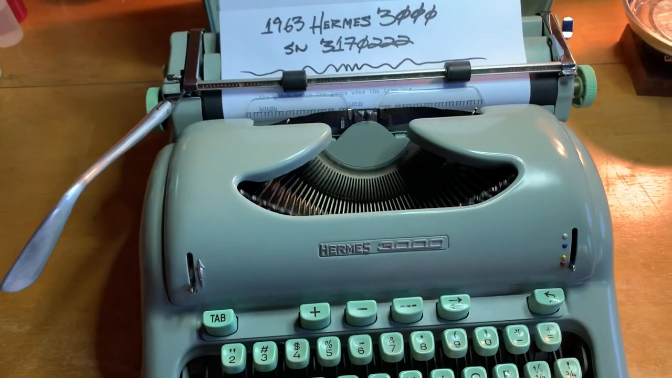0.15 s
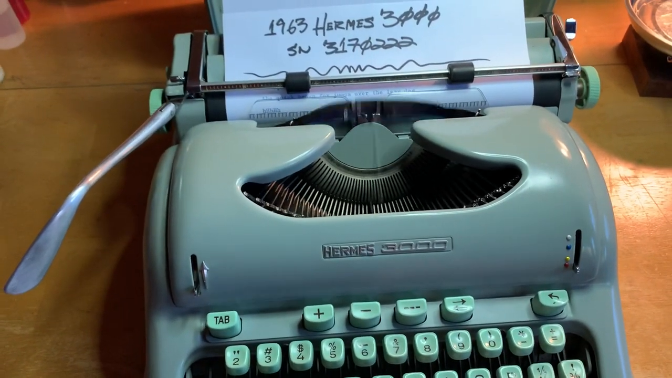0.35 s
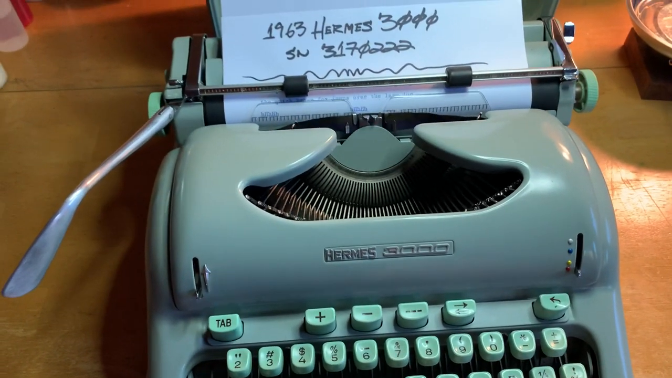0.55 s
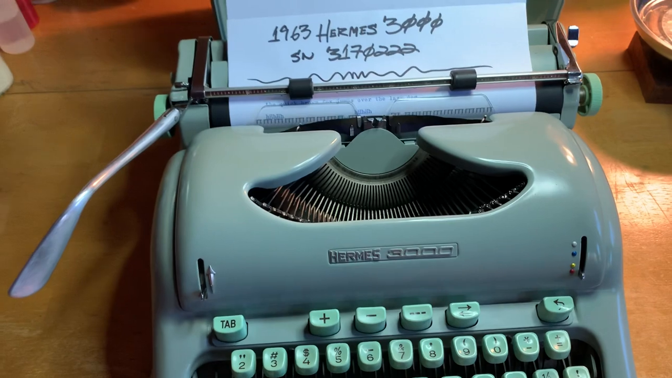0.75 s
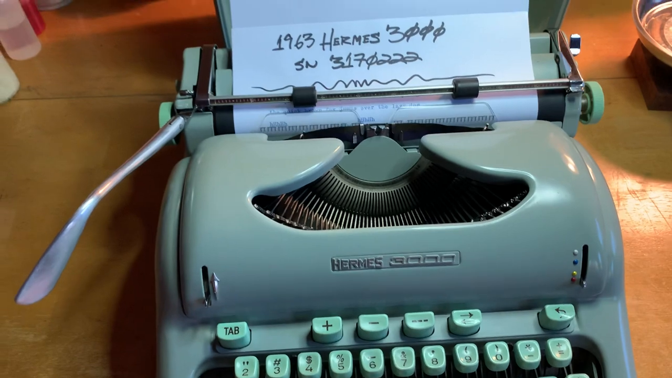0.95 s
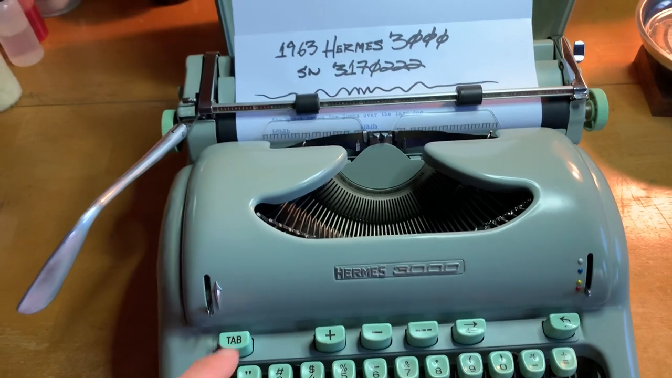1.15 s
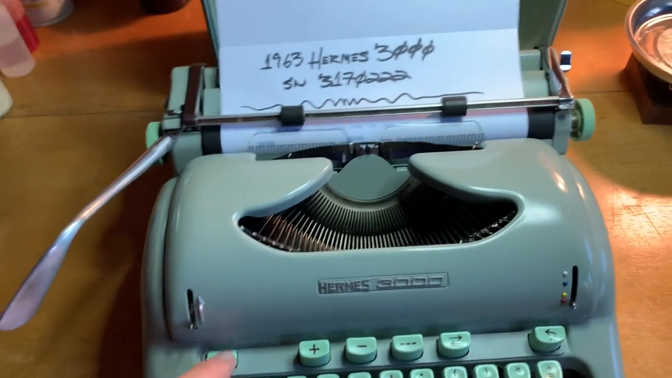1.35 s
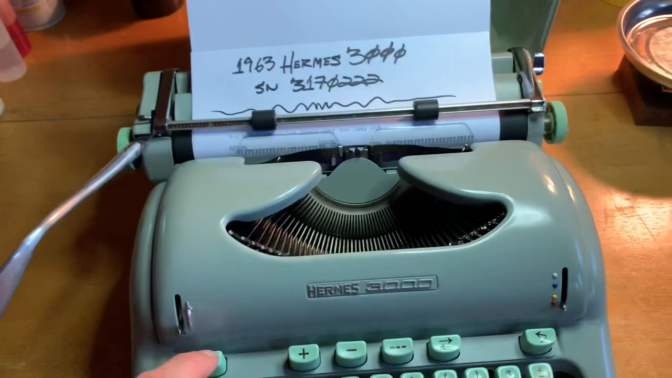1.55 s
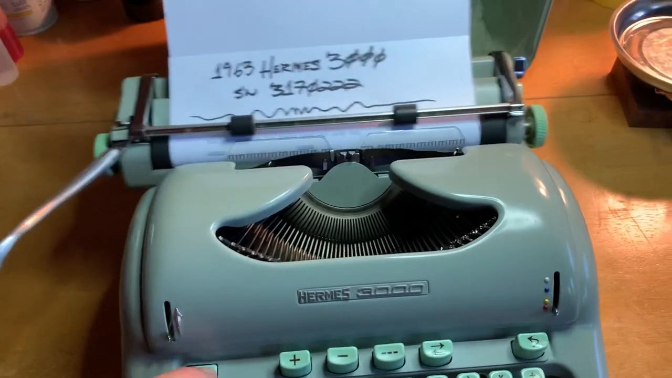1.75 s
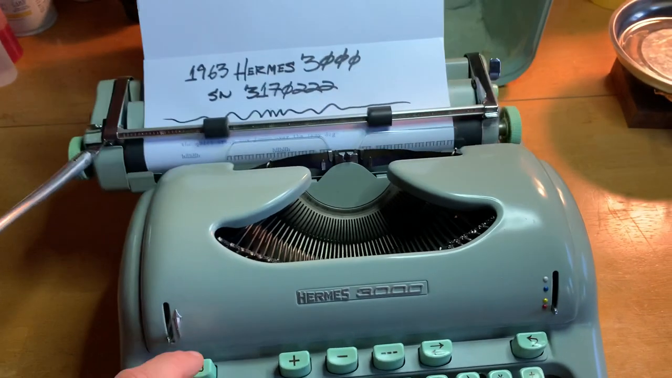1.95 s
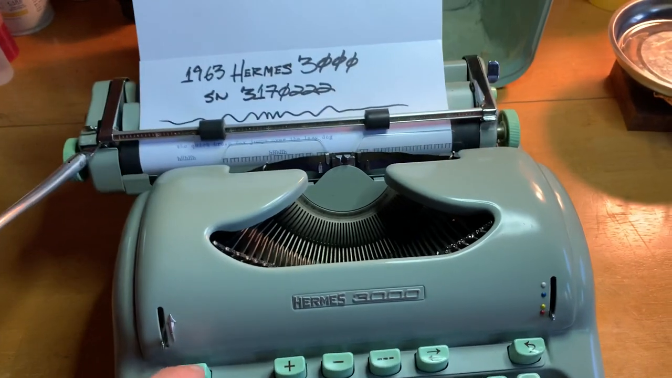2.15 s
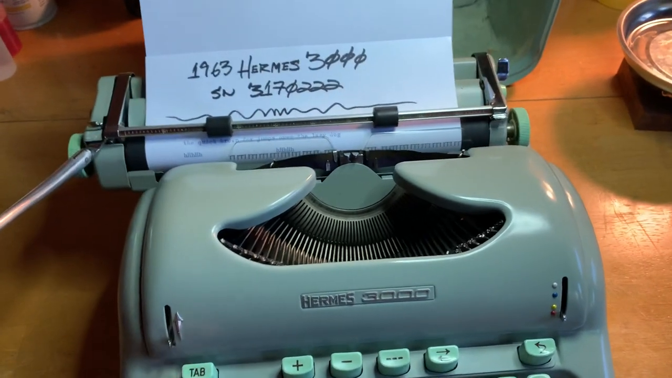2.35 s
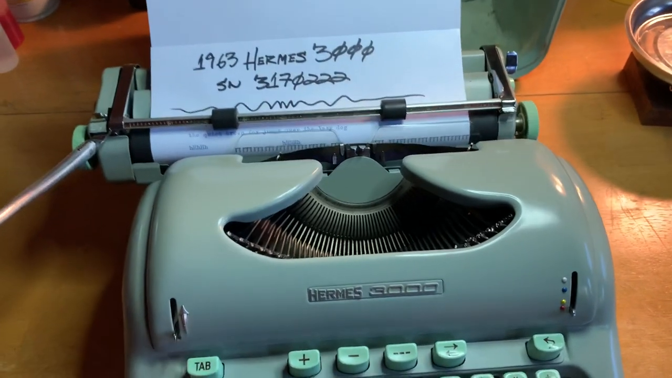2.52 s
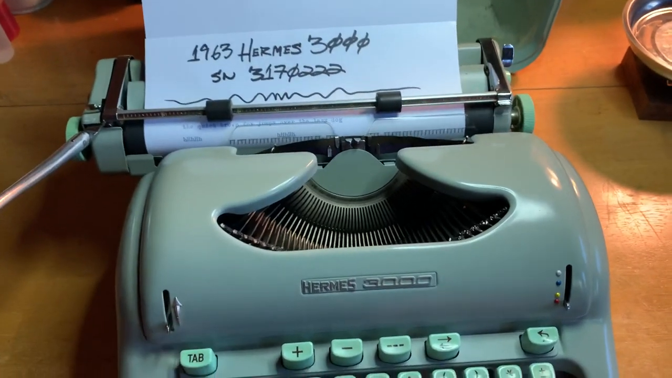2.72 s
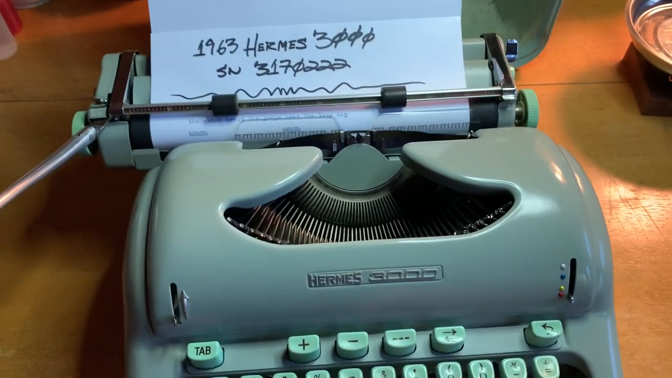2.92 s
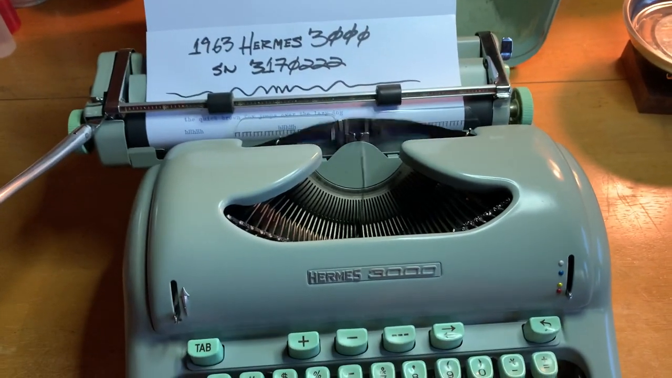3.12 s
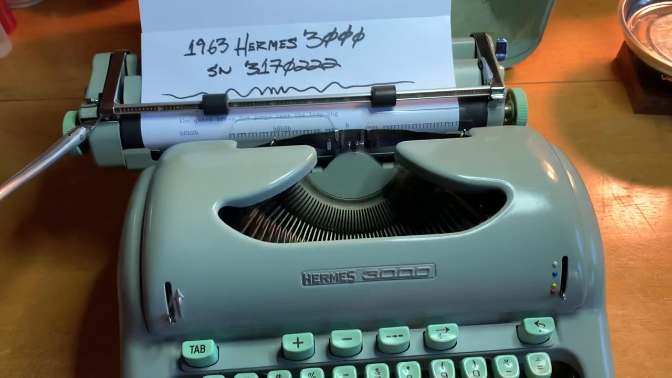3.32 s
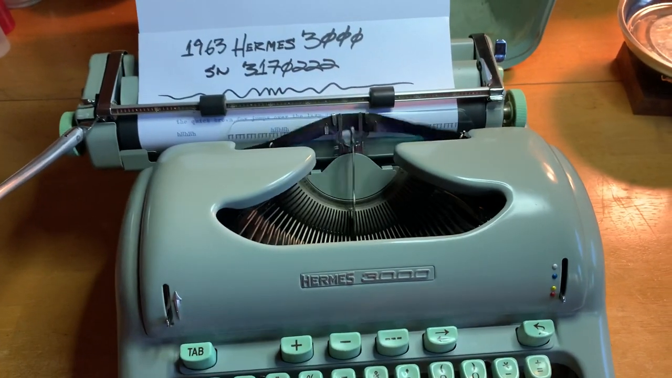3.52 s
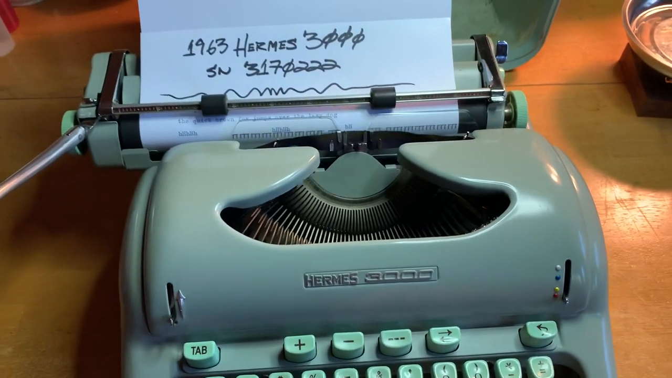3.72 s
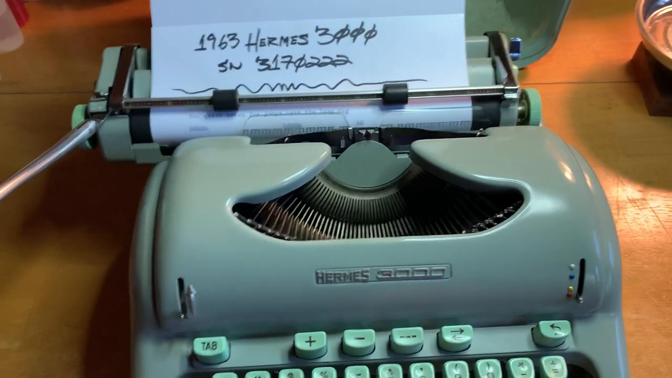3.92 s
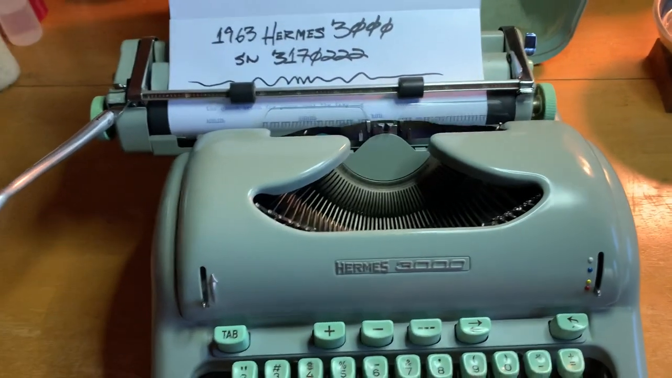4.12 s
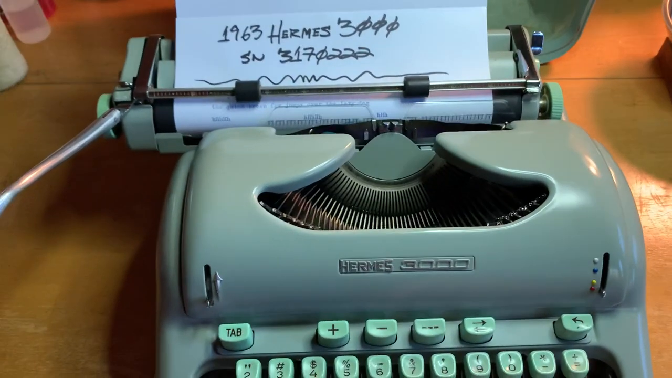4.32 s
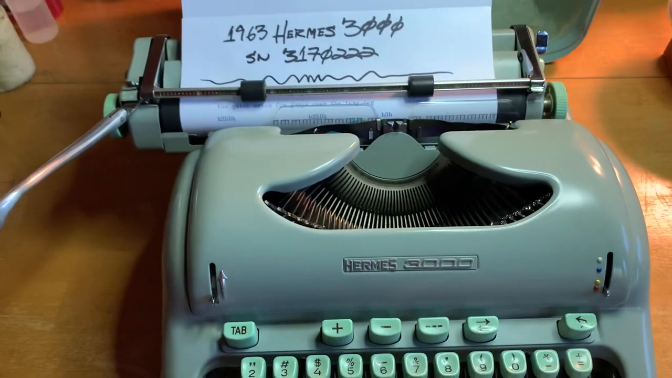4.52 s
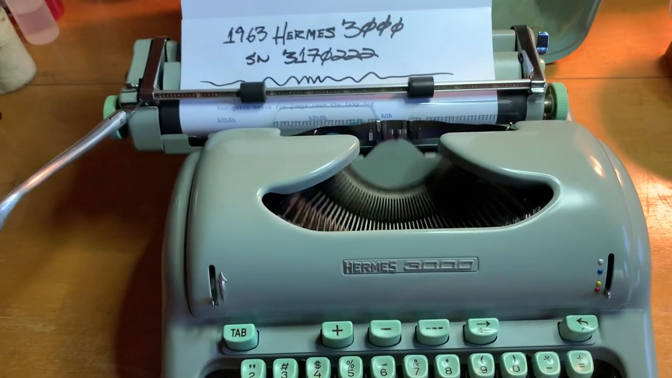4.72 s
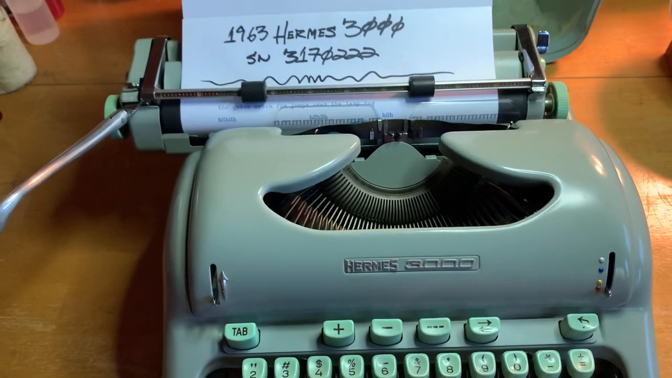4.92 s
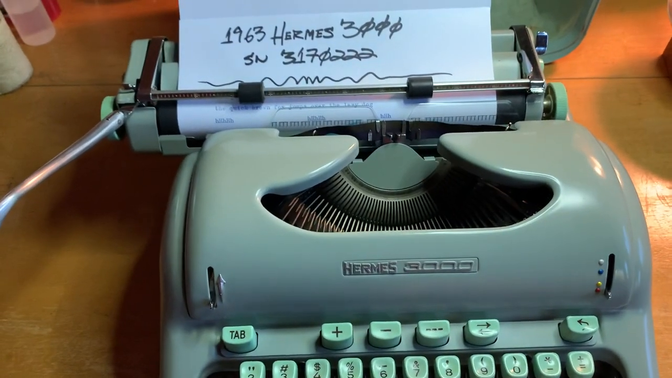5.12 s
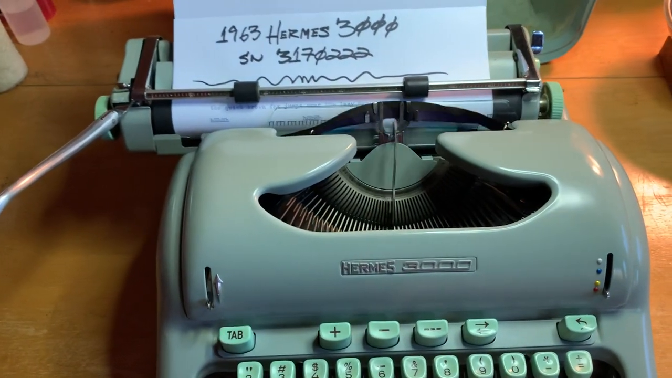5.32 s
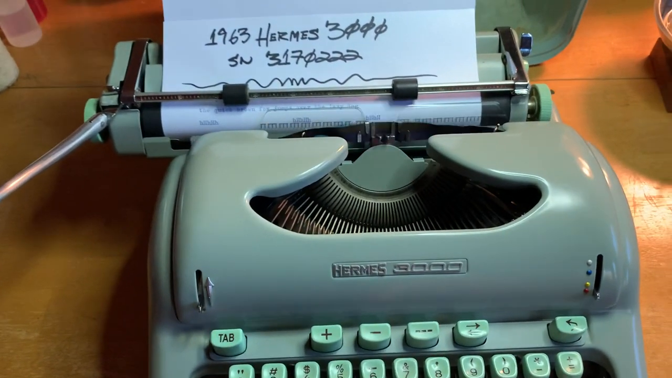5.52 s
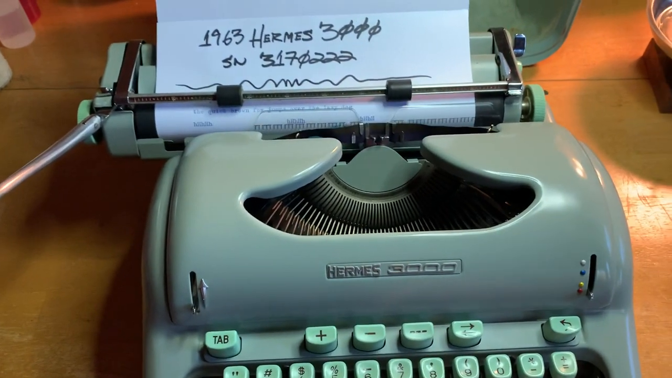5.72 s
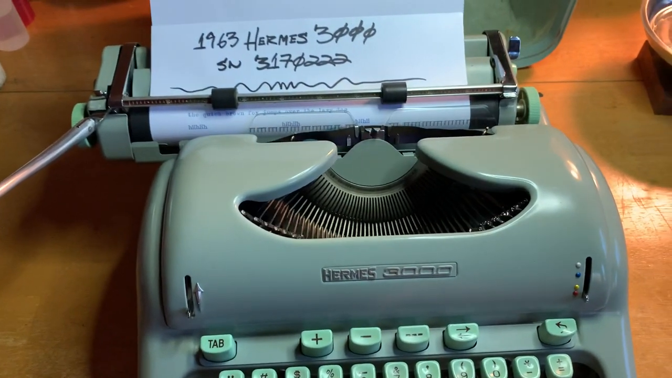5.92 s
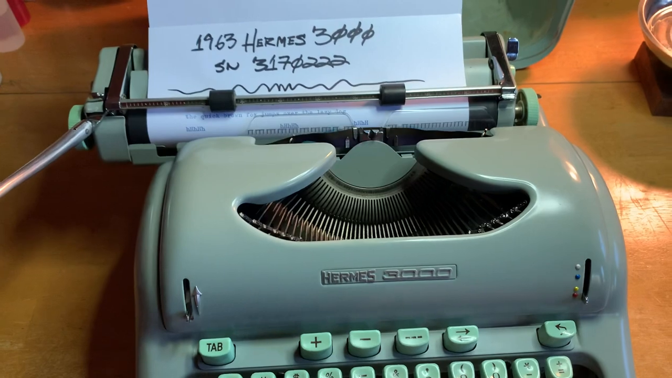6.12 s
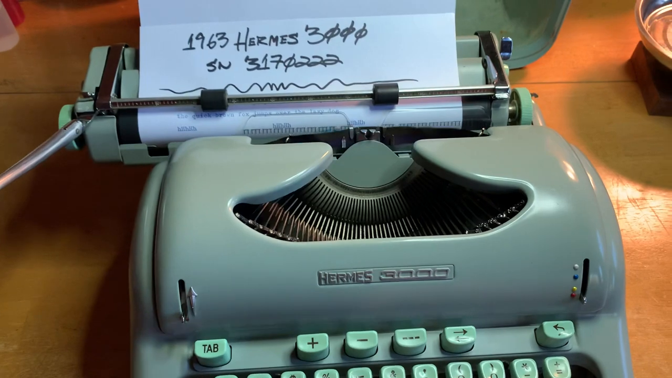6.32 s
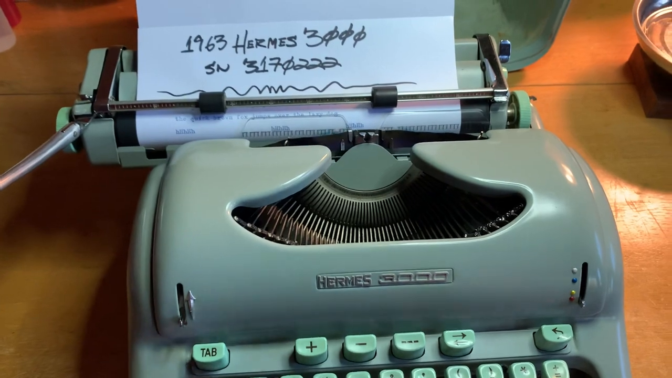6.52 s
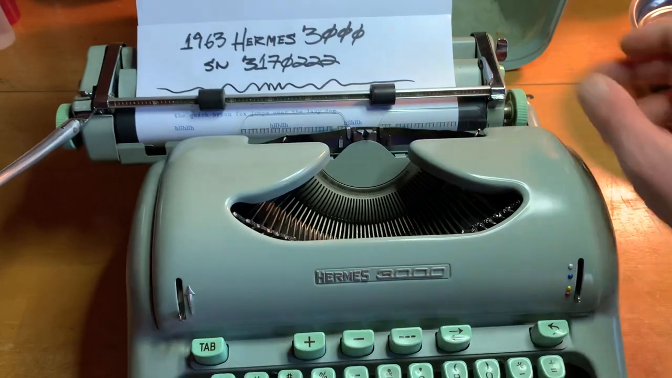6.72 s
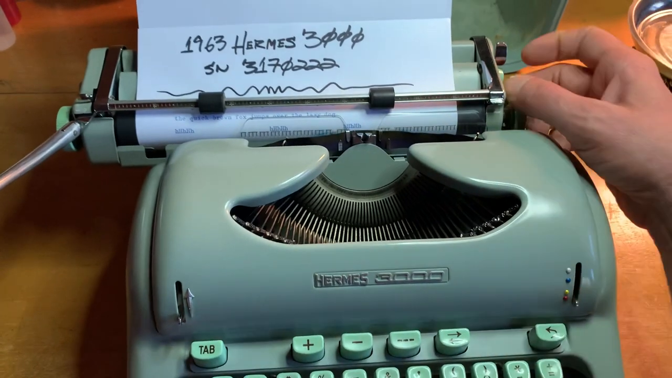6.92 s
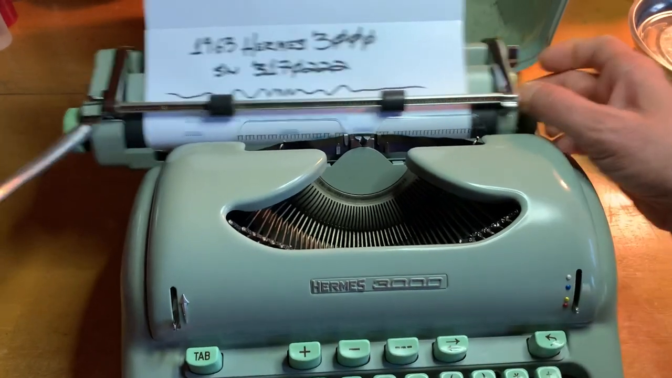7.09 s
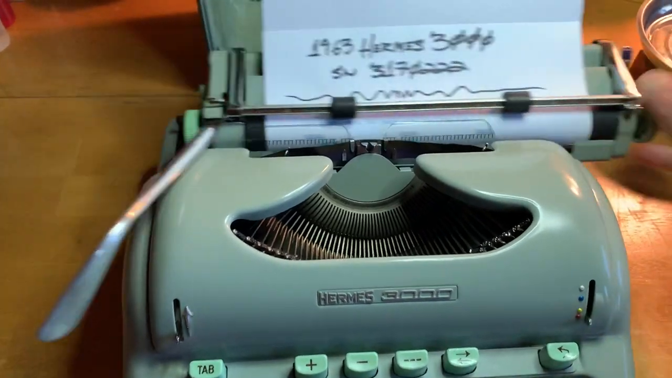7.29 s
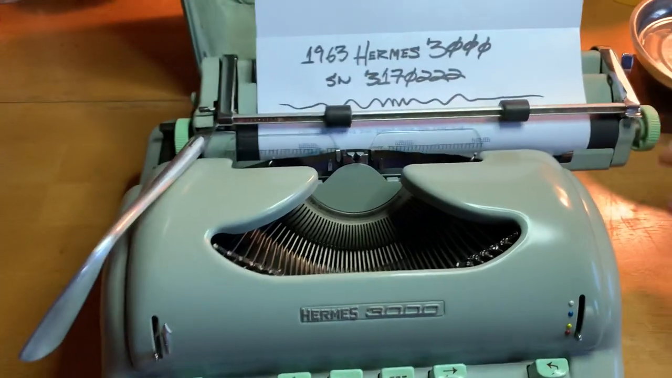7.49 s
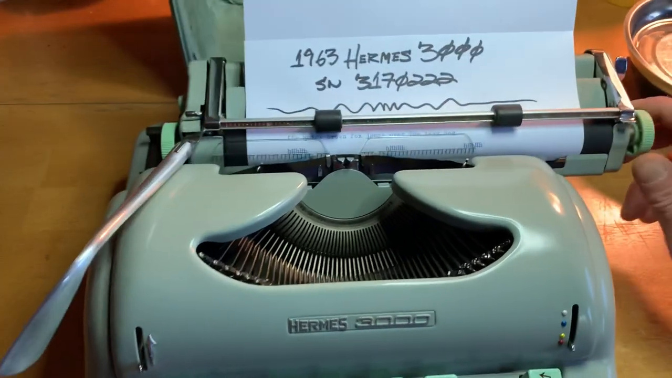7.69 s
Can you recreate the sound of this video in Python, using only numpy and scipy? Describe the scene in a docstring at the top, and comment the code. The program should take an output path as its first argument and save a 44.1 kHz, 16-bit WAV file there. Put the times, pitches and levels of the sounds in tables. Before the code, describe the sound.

Close, wide stereo sound of a manual typewriter on a wooden desk in a small, faintly rumbling room. A lever thump and one crisp letter strike come first, then the carriage lurches and rattles along. After a quiet pause, more single letters alternate with heavy shift and space thumps. A hand grips the knob and slides the carriage over its buzzing ratchet to a soft stop.

```python
"""Manual typewriter on a wooden desk, close by

Heard close to the machine, with a processed stereo spread, in a small, faintly rumbling room. Six letters
are struck one at a time: key linkage, escapement, type slug on the platen, type bar falling back. Shift and
space thump the desk, the carriage runs along on the tab key, and at the end a hand slides it back over its
ratchet. Contacts are bursts of coloured noise, ringing metal and desk are dying sines, and rolling is noise
pulsed by rack teeth."""
import sys
import numpy as np
from scipy import signal
from scipy.fft import rfft, irfft, next_fast_len
from scipy.io import wavfile
from scipy.ndimage import uniform_filter1d

SR = 44100
rng = np.random.default_rng(int(sys.argv[2]) if len(sys.argv) > 2 else 0)


def store_pcm(level_fs):
    """Save levels as 16-bit WAV."""
    pcm = np.round(np.clip(level_fs, -1, 1) * 32767).astype(np.int16)
    wavfile.write(sys.argv[1], SR, np.atleast_2d(pcm).T)


N = 341775
TIME = np.arange(N) / SR
# spectra are padded by a second for the tails
SIZE = next_fast_len(N + SR, True)
HZ = np.fft.rfftfreq(SIZE, 1 / SR)

# Levels below are relative: each layer adds its own offset.
# The typed letters. Each row: slug on the platen in seconds, slug level in dB, key down this many seconds
# earlier, key level in dB, type bar home this many seconds later, landing level in dB.
LETTERS = [(0.3722, -13, 0.037, -30, 0.12, -30.5), (3.043, -12, 0.036, -27.5, .1253, -31),
           (3.5093, -14, 0.041, -28.5, .1341, -28.5), (3.970, -11.5, 0.034, -23.5, 0.14, -32),
           (5.2847, -13.5, .0351, -27.5, .1363, -29.5), (6.1928, -13, 0.038, -26.5, 0.13, -31)]
# Shift, space bar and the carriage's end stop. Each row: start in seconds, level in dB, dull knock in dB,
# fade in seconds, push on the desk in dB.
THUMPS = [(0.159, -22.5, -26, 0.0038, -30.5), (3.326, -27.5, -20.5, 0.0063, -26),
          (3.787, -30.5, -29.5, .0075, -36), (4.7433, -17.5, -26, 0.0026, -27),
          (5.8455, -24, -26, 0.0072, -29), (7.379, -33, -35.5, 0.0092, -39)]
# The carriage catching as it lurches along on the tab key. Each row: start in seconds, level in dB,
# dull knock in dB, fade in seconds, push on the desk in dB.
LURCHES = [(1.344, -32.5, -35, 0.0041, -45), (1.4546, -36, -32, 0.014, -46.5),
           (1.5217, -28.5, -33, 0.0034, -45), (1.555, -36.5, -33, 0.006, -40.5),
           (1.68, -27.5, -31, 0.0052, -39), (1.834, -26, -28, 0.0049, -54),
           (1.864, -35, -35.5, 0.0093, -47), (1.902, -34, -28, 0.0056, -38)]
# Latches snapping. Each row: start in seconds, level in dB, fade in seconds.
CLICKS = [(0.0562, -51, 0.0036), (1.2922, -44, .0016), (1.329, -47, .0025), (1.494, -33.5, 0.0018),
          (1.654, -38.5, 0.0053), (2.6824, -54, 0.0068), (2.879, -57.5, 0.0057), (4.651, -51, 0.006),
          (4.6589, -35.5, 0.0015), (5.5549, -31, 0.0032), (5.752, -46.5, 0.007), (7.03, -46.5, 0.0022),
          (7.04, -40, 0.0023), (7.315, -48, 0.0024)]
# A hand taking hold of the platen knob. The one row: start in seconds, level in dB.
GRIP = (6.818, -45.5)
# Colour of steel on steel. Each row: frequency in Hz, gain in dB.
STEEL = [(60, -19.5), (300, -7.5), (900, -2.5), (1700, -5.5), (3200, 0.5), (5000, -2.5), (8000, -1.5),
         (10000, -1.5), (13000, -5.5), (15400, -9), (16200, -30.5)]

# a falling type bar rattles part of the way home: share of its fall, level in dB
RATTLE_SHARE, RATTLE_DB = .49, -36
TAB_START_S, TAB_END_S = 1.327, 1.925


def amp(db):
    """Amplitude ratio of a level in dB."""
    return 10 ** (np.asarray(db) / 20)


def read(points, hz):
    """A table's value on a log-frequency axis."""
    f, value = np.transpose(points)
    return np.interp(np.log(hz + 1), np.log(f + 1), value)


def add(mix, s, sound):
    """Lays a sound into the mix at time s."""
    part = mix[:, round(s * SR):][:, :sound.shape[-1]]
    part += sound[..., :part.shape[1]]


def grit(size, clump_db):
    """Noise of about unit power, bunched into tiny metal contacts of 32 samples each."""
    clumps = amp(clump_db * np.clip(rng.standard_normal(size // 32 + 1), -2, 2))
    clumps /= np.sqrt(np.mean(clumps ** 2))
    return rng.standard_normal((2, size)) * np.repeat(clumps, 32)[:size]


def contact(db, fade, rise=.0002, clump_db=2.0):
    """A burst of chatter between two parts; the point of contact gives each its own uneven colour."""
    t = TIME[:8192]
    hz = np.fft.rfftfreq(len(t), 1 / SR)
    knots = np.geomspace(600, 16000, 50)
    colour = amp(2.6 * np.interp(hz, knots, rng.standard_normal(len(knots)), left=0))
    colour /= np.sqrt(np.mean(colour ** 2))
    chatter = irfft(rfft(grit(len(t), clump_db)) * colour)
    return amp(db) * (1 - np.exp(-t / rise)) * np.exp(-t / fade) * chatter


def travel(mix, s, db, swell):
    """A lever rubs along its guide, ever louder, just before it lands at time s."""
    rub = contact(db, swell)[:, :round(.04 * SR)]
    add(mix, s - .04, rub[:, ::-1])  # a fade played backwards swells


def through_case(x, colour):
    """Causal filter of unit power: a broad colour with the resonances of the case and frame on top."""
    # Each row: resonance in Hz, width in Hz, boost in dB.
    case = [(353.4, 14, 4.5), (440, 170, 6), (574.8, 12, 8.5), (829, 53, 8), (990, 90, 6), (1282, 120, 4.5),
            (2360, 99, -2.5), (2399, 44, 6), (2723, 31, -7.5), (2993, 28, -2), (3500, 68, -4),
            (4030, 130, 3), (5530, 100, -3.5), (7833, 150, 4)]
    hz = np.fft.rfftfreq(8192, 1 / SR)
    peaks_db = sum(db / (1 + (2 * (hz - f) / width) ** 2) for f, width, db in case)
    gain = amp(read(colour, hz) + peaks_db)
    # folding the cepstrum forward gives minimum phase
    cepstrum = irfft(np.log(gain / np.sqrt(np.mean(gain ** 2))))
    cepstrum[1:len(hz) - 1] *= 2
    cepstrum[len(hz):] = 0
    taps = irfft(np.exp(rfft(cepstrum)))
    return signal.oaconvolve(x, taps[None], axes=1)[:, :N]


def modes_of(table):
    """One dying sine for each mode, with alternating signs."""
    t = TIME[:SR]
    return np.array([(-1) ** k * amp(db - 60 * t / t60) * np.sin(2 * np.pi * hz * t)
                     for k, (hz, db, t60) in enumerate(table)])


def rolling(level, colour, teeth_hz, tick_fade, tick_db, uneven_db):
    """The carriage rolls on its rail while the rack's teeth tick past, none quite alike."""
    wander = 6 * uniform_filter1d(rng.standard_normal(N), 1500)
    teeth = np.cumsum(teeth_hz * (1 + wander)) / SR
    size_db = tick_db + uneven_db * np.clip(rng.standard_normal(N), -1.5, 1.5)
    size = amp(size_db)[teeth.astype(int)]
    since_tooth_s = (teeth % 1) / teeth_hz
    ticks = size * np.exp(-since_tooth_s / tick_fade)
    return through_case(level * (.5 + ticks) * grit(N, 3.9), colour)


def tail(t60s, onset):
    """Spectrum of a dense train of reflections, each band dying at its own speed."""
    hz, t, z = signal.stft(rng.choice([-1., 1.], (2, SR)), SR, nperseg=256)
    t60 = read(t60s, hz)[:, None]
    even_power = np.sqrt(2 * np.log(1000) / (t60 * SR))
    z = z * amp(-60 * t / t60) * even_power
    taps = signal.istft(z, SR, nperseg=256)[1][:, :SR]
    swell = 1 - np.exp(-(TIME[:SR] / onset) ** 2)
    return rfft(taps * swell, SIZE)


def hush():
    """The low steady rumble of the room: noise of one fixed colour."""
    # Each row: frequency in Hz, gain in dB.
    rumble = [(15, -50), (25, -20), (44, -6.5), (62, -4), (84, -16), (114, -4.5), (170, -20), (270, -26.5),
              (450, -37.5), (800, -41), (1400, -51.5), (3250, -51.5), (13000, -58), (16000, -69)]
    gain = amp(read(rumble, HZ))
    gain /= np.sqrt(np.mean(gain ** 2))
    return amp(-55.5) * rfft(rng.standard_normal((2, SIZE))) * gain


def desk(lag=.006, swell=0.013, uneven_db=2):
    """Every heavy movement rocks the machine on the desk top, each a little differently."""
    # Modes of the machine on its desk. Each row: frequency in Hz, level in dB, 60 dB decay in seconds.
    desk_modes = [(43, -14.5, .5), (60, -4.5, .7), (77.6, 1.5, 0.56), (104, -8, .45), (139.6, -1, 0.6),
                  (178.8, -5, 0.31), (208.4, -13, 0.78), (224.6, -9.5, 0.4), (292.5, -13.5, .25)]
    # push at each stage of a letter, in dB
    key_push_db, slug_push_db, rattle_push_db, home_push_db = -41, -37, -37, -39.5
    pushes = [(s, db) for s, *_, db in THUMPS + LURCHES]
    for strike, _, lead, _, fall, _ in LETTERS:
        pushes += [(strike - lead, key_push_db), (strike, slug_push_db),
                   (strike + RATTLE_SHARE * fall, rattle_push_db), (strike + fall, home_push_db)]
    out = np.zeros((2, N))
    modes = modes_of(desk_modes) * (1 - np.exp(-TIME[:SR] / swell))
    for s, db in pushes:
        blend_db = db + uneven_db * rng.standard_normal((2, len(desk_modes)))
        add(out, s + lag, amp(blend_db) @ modes)
    return rfft(out, SIZE)


def hands():
    """Soft rubbing of fingers on keys and levers easing back, and one padded bump on the knob."""
    # Each row: start in seconds, level in dB, fade in seconds.
    rustles = [(.002, -60, .04), (.69, -67.5, 0.024), (2.651, -68, 0.062), (2.80, -68, 0.057),
               (4.82, -54, 0.027), (4.908, -52, 0.023), (5.025, -56.5, 0.0098), (5.505, -52.5, .02),
               (5.724, -59, 0.087), (6.546, -57, 0.049)]
    # Colour of rubbing fingers. Each row: frequency in Hz, gain in dB.
    soft = [(100, -18.5), (500, 0.5), (1100, 7.5), (1600, 9), (2600, 1.5), (4000, 0), (7000, -22),
            (12000, -20.5), (16000, -26)]
    # Modes of the carriage bumped at its knob. Each row: frequency in Hz, level in dB, 60 dB decay in seconds.
    knob = [(159.3, -17, 0.54), (218, -3.5, 0.26), (260, -0.5, 0.29), (300, -3.5, 0.23), (380, 0, 0.07),
            (495, -8, 0.047), (660, -5, 0.082), (1084, -4, 0.027)]
    rub, bump = np.zeros((2, 2, N))
    for s, db, fade in rustles:
        add(rub, s, contact(db, fade, rise=0.0028, clump_db=6.0))
    add(bump, GRIP[0], amp(GRIP[1]) * modes_of(knob).sum(0))
    return through_case(rub, soft) + bump


def loose_parts(fade=0.0018, count=40, loudest_db=-43, range_db=20):
    """Small steel parts tick at random moments while the carriage runs, most of them faintly."""
    steel = np.zeros((2, N))
    for when, faintness in rng.random((count, 2)):
        s = TAB_START_S + when * (TAB_END_S - TAB_START_S)
        add(steel, s, contact(loudest_db - range_db * faintness, fade, rise=.0001))
    return through_case(steel, STEEL)


def ringing(strike_db=-33, return_db=-22, rattle_db=-13, thump_db=-24, lurch_db=-21, click_db=-24,
            uneven_db=4, detune=0.021):
    """Every blow lands somewhere else, so each wakes its own blend of the metal's modes."""
    # Type bars, springs and panels. Each row: frequency in Hz, level in dB, 60 dB decay in seconds.
    bars = [(456, 2, 0.087), (569, -6, 0.058), (895, -3.5, 0.053), (1002, -4, .14), (1256, -4, 0.081),
            (1423, -0.5, 0.13), (1810, -6, 0.18), (2340, -4.5, 0.089), (3000, -12.5, 0.065),
            (3070, -11.5, 0.12), (3470, -9, .12), (3800, -8.5, 0.073), (5600, -9, .15), (7300, -16, 0.11),
            (10100, -10, 0.15)]
    kinds = (THUMPS, thump_db), (LURCHES, lurch_db), (CLICKS, click_db)
    blows = [(row[0], row[1] + db) for rows, db in kinds for row in rows]
    for strike, db, _, _, lag, home_db in LETTERS:
        blows += [(strike, db + strike_db), (strike + lag, home_db + return_db),
                  (strike + RATTLE_SHARE * lag, RATTLE_DB + rattle_db)]
    hz, mode_db, t60 = np.transpose(bars)
    t, out = TIME[:SR // 5], np.zeros((2, N))
    fades = amp(mode_db[:, None] - 60 * t / t60[:, None]) * (1 - np.exp(-t / 0.00062))
    for s, db in blows:
        shift, left, right = rng.standard_normal((3, len(bars)))
        shifted_hz = hz * (1 + detune * shift)
        modes = fades * np.sin(2 * np.pi * shifted_hz[:, None] * t)
        blend_db = db + uneven_db * np.clip([left, right], -1.5, 1.5)
        add(out, s, amp(blend_db) @ modes)
    return out


def slide_back(start_s=7.05, length_s=0.3, level_db=-44.5, steepness=1.6):
    """A hand pushes the carriage home in one sweep; the zip of its ratchet swells and sinks with the speed."""
    # Colour of the ratchet. Each row: frequency in Hz, gain in dB.
    ratchet = [(40, 1.5), (130, 21), (300, 6), (460, 5), (1000, 2.5), (1800, -2), (4000, 3), (6000, -3.5),
               (10000, -6), (13500, -7), (15400, -29), (16200, -35)]
    speed = np.sin(np.pi * np.clip((TIME - start_s) / length_s, 0, 1))
    level = amp(level_db) * np.abs(speed) ** steepness
    # the speed sets the loudness only: the tooth rate wanders around one mean
    return rolling(level, ratchet, teeth_hz=142, tick_fade=0.0045, tick_db=3.0, uneven_db=2.5)


def tab_run(roll_db=-69, clatter_db=-7.5, swell_s=0.011, fade_s=0.014):
    """The carriage runs on the tab key; the heavier a lurch knocks, the harder it clatters around it."""
    # Colour of the rolling carriage. Each row: frequency in Hz, gain in dB.
    roll = [(40, 15.5), (120, 17.5), (300, 5), (480, -5), (1000, 8.5), (1600, 2.5), (3200, 3), (6000, -2),
            (10000, -10), (13500, -17), (15400, -37), (16200, -20)]
    level = amp(roll_db) * ((TIME > TAB_START_S) & (TIME < TAB_END_S))
    for s, _, knock_db, _, _ in LURCHES:
        shape = np.exp(-np.maximum((s - TIME) / swell_s, (TIME - s) / fade_s))
        level = level + amp(knock_db + clatter_db) * shape
    return rolling(level, roll, teeth_hz=69.73, tick_fade=0.0015, tick_db=9.5, uneven_db=6.5)


def levers(knock_lag=0.0034):
    """Each lever gives a bright steel click, and the heavy part behind it a dull knock."""
    # Colour of the dull knock. Each row: frequency in Hz, gain in dB.
    dull = [(50, -11.5), (160, 4), (300, -7.5), (480, -2), (700, -7.5), (1000, -12.5), (1600, -12),
            (2400, -21), (4000, -22), (12000, -44)]
    # slack taken up before each thump: lead in seconds, dB against the knock, fade in seconds
    touch_lead_s, touch_db, touch_fade_s = 0.072, -20, 0.018
    steel, knock = np.zeros((2, 2, N))
    for s, db, knock_db, fade, _ in THUMPS + LURCHES:
        travel(steel, s, db - 11.5, swell=0.0038)
        add(steel, s, contact(db + 0.5, fade, rise=0.0003))
        add(knock, s + knock_lag, contact(knock_db, fade=.013, rise=0.0022))
    for s, _, knock_db, _, _ in THUMPS:
        touch = knock_db + touch_db
        add(steel, s - touch_lead_s, contact(touch - 8.5, touch_fade_s, clump_db=7))
        add(knock, s - touch_lead_s, contact(touch, touch_fade_s))
    # the pawl ticks ahead of each lurch
    for s, *_ in LURCHES:
        add(steel, s - .011, contact(-40.5, fade=0.0033, clump_db=-4.0))
    # a latch knocks a little under its click
    for s, db, fade in CLICKS:
        add(steel, s, contact(db, fade, clump_db=7.0))
        add(knock, s, contact(db - 13, 2.4 * fade))
    # the carriage rattles under the hand
    add(steel, GRIP[0], contact(-58, fade=0.018, clump_db=-8))
    add(knock, GRIP[0], contact(-45, fade=0.018))
    return through_case(steel, STEEL) + through_case(knock, dull)


def letters(trip_lead=.0085, rebound=.0019):
    """The linkage takes up, the escapement trips, the slug hits and rebounds, the bar rattles home."""
    # Colour of the slug on the platen. Each row: frequency in Hz, gain in dB.
    slug_colour = [(60, -11), (250, -1), (500, 4), (850, 5), (1700, -1), (3200, 6), (5000, 4.5),
                   (7500, 1.5), (10000, 0.5), (13000, -0.5), (15400, -9.5), (16200, -27)]
    # Colour of the type bar coming to rest. Each row: frequency in Hz, gain in dB.
    rest_colour = [(60, -23.5), (300, 7.5), (700, 0.5), (1000, 5.5), (1700, 1), (3200, -1), (5000, -1),
                   (8000, 0), (13000, -2), (15400, -9), (16200, -26.5)]
    slug, steel, rest = np.zeros((3, 2, N))
    for strike, db, lead, key_db, lag, home_db in LETTERS:
        key, home = strike - lead, strike + lag
        travel(steel, key, key_db - 7, swell=0.00098)
        add(steel, key, contact(key_db, fade=0.018, rise=0.00069, clump_db=4.0))
        add(steel, strike - trip_lead, contact(db - 8.5, fade=0.009, rise=.0004))
        add(slug, strike, contact(db + 0.5, fade=0.0016, rise=0.00035, clump_db=1.5))
        add(slug, strike + rebound, contact(db + 3, fade=0.0029, clump_db=-2))
        # a slow steel chatter follows the blow
        add(steel, strike, contact(db - 35.5, fade=0.069, rise=0.026, clump_db=3))
        rattle = strike + RATTLE_SHARE * lag
        add(rest, rattle, contact(RATTLE_DB, fade=0.023, rise=0.0032, clump_db=3.5))
        add(steel, home, contact(home_db + 2, fade=0.0039, rise=.0001))
        add(rest, home, contact(home_db, fade=0.014, rise=0.0032, clump_db=1.5))
    return through_case(slug, slug_colour) + through_case(steel, STEEL) + through_case(rest, rest_colour)


def widen(z):
    """Stereo widening: sides most alike in bass and top treble; left is early in the middle, late outside it."""
    # Each row: frequency in Hz, left-right likeness from 0 to 1.
    likeness = [(100, .88), (400, .95), (900, .8), (1400, .5), (1900, .25), (2800, .5), (5000, .5),
                (6100, .25), (7400, .55), (8400, .96), (15000, .96)]
    # Each row: frequency in Hz, left minus right in dB.
    tilt = [(400, .2), (800, -3.5), (1100, 0), (1550, 2.5), (2400, 0), (3100, 1), (4300, -1.5), (5700, -5),
            (7400, 1), (8500, 0)]
    angle = np.arcsin(np.clip(read(likeness, HZ), 0, 1)) / 2
    left, right = np.cos(angle) * z + np.sin(angle) * z[::-1]
    # delay of the left channel in seconds, by frequency
    lag = np.interp(HZ, [300, 800, 5800, 6600], [.0002, -.0001, -.0001, .000292])
    lean = amp(read(tilt, HZ) / 2)
    return np.array([left * np.exp(-2j * np.pi * HZ * lag) * lean, right / lean])


def scene():
    """The mechanism shakes the loose metalwork, and the room answers."""
    # Decay of the loose metalwork. Each row: frequency in Hz, 60 dB decay in seconds.
    metalwork = [(200, 0.55), (800, 0.038), (3000, 0.1), (12000, 0.033)]
    # Decay of the room. Each row: frequency in Hz, 60 dB decay in seconds.
    room = [(150, 1), (500, 0.65), (1400, 0.46), (3500, .48), (8000, 0.19), (14000, 0.17)]
    low = hush() + amp(-2.0) * desk()
    near = 1 + amp(-3) * tail(metalwork, onset=.002)
    space = amp(1.0) * (near + amp(-8.5) * tail(room, onset=0.015))
    machine = letters() + levers() + ringing() + tab_run() + slide_back() + hands() + loose_parts()
    return irfft(widen(rfft(machine, SIZE) * space + low), SIZE)[:, :N]


def record(dry):
    """The recorder's band limit: a steep low-pass at 15650 Hz."""
    low_pass = signal.firwin(511, 15650, window=("kaiser", 9), fs=SR)
    return signal.oaconvolve(dry, low_pass[None], "same")


dry = scene()
out = record(dry)
store_pcm(out)
```